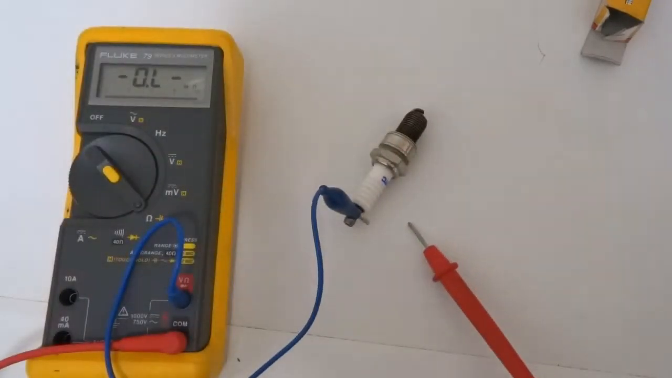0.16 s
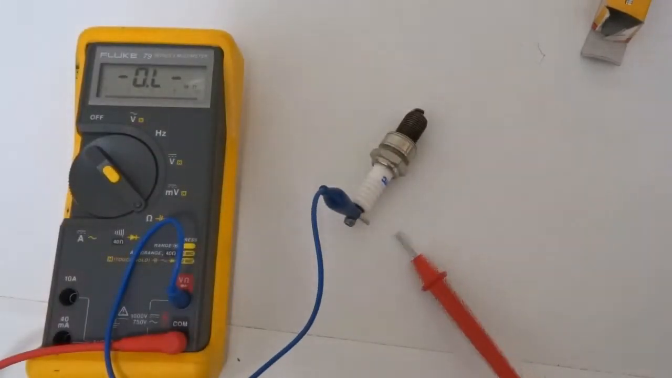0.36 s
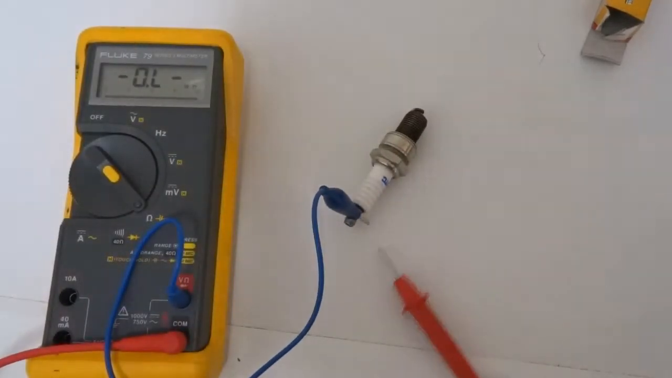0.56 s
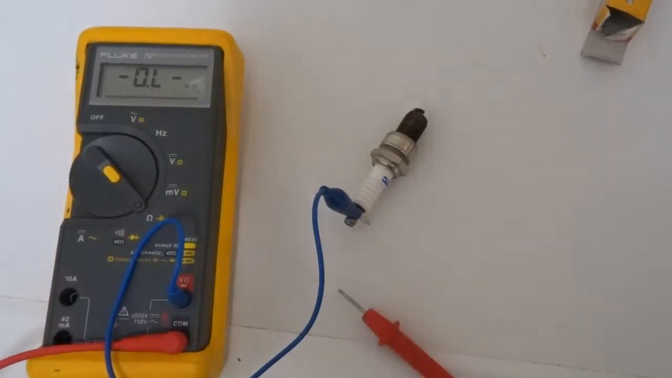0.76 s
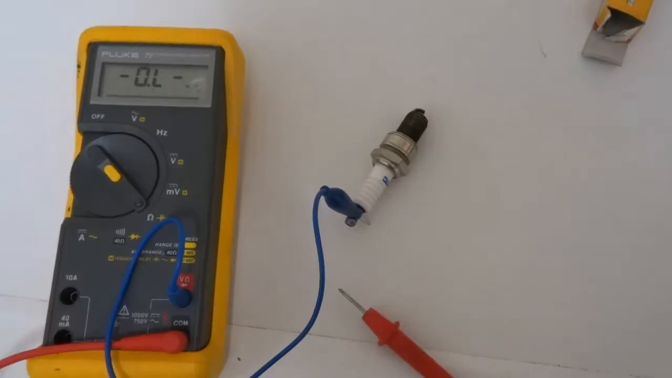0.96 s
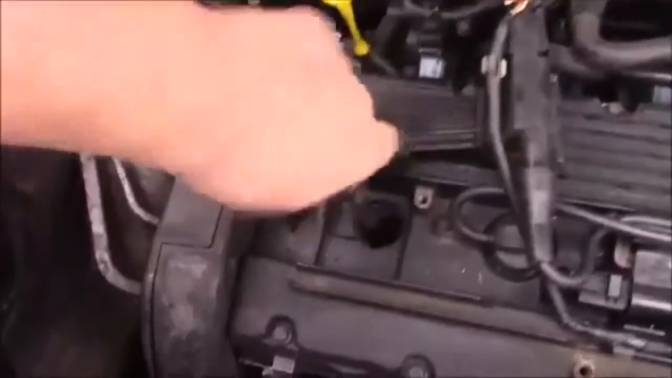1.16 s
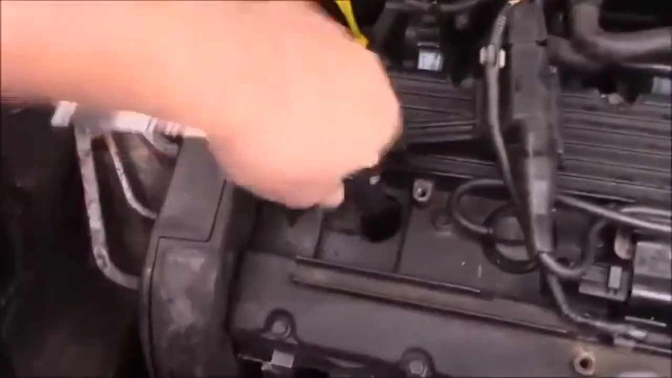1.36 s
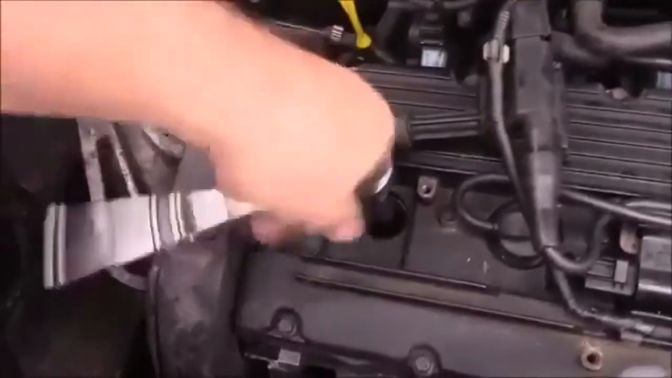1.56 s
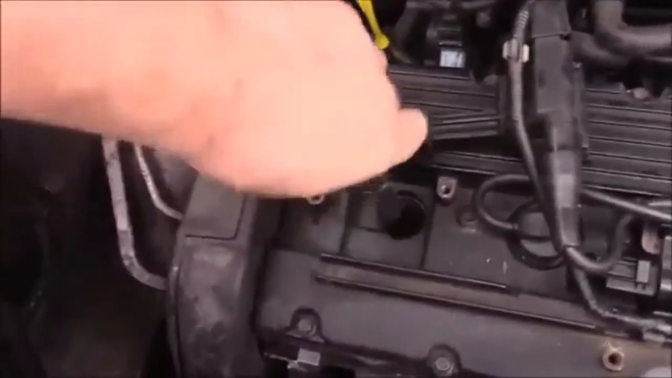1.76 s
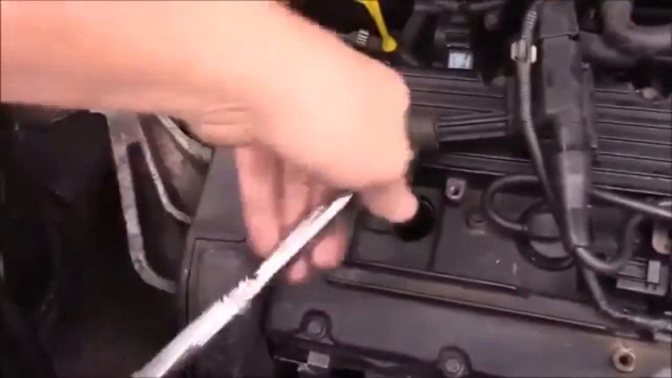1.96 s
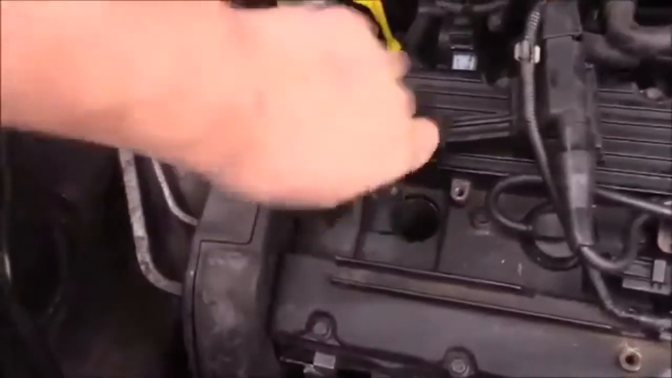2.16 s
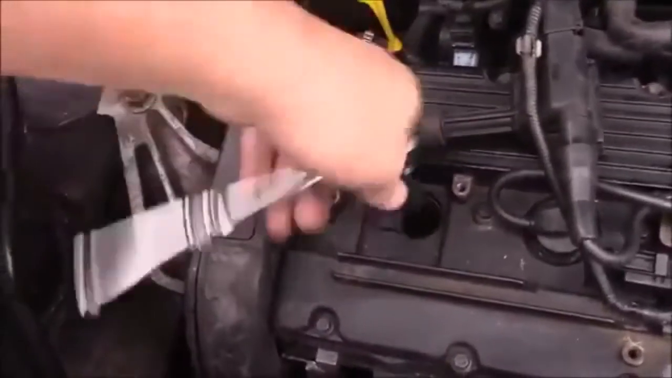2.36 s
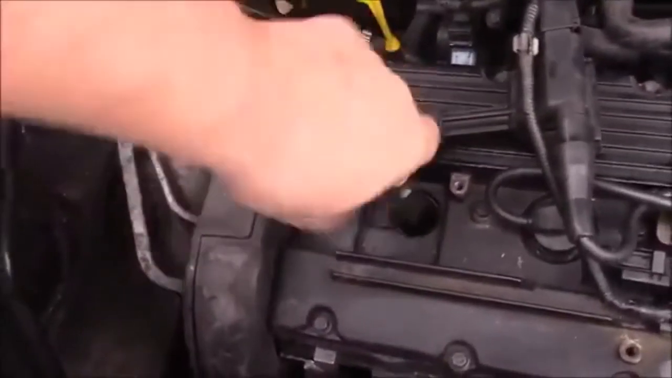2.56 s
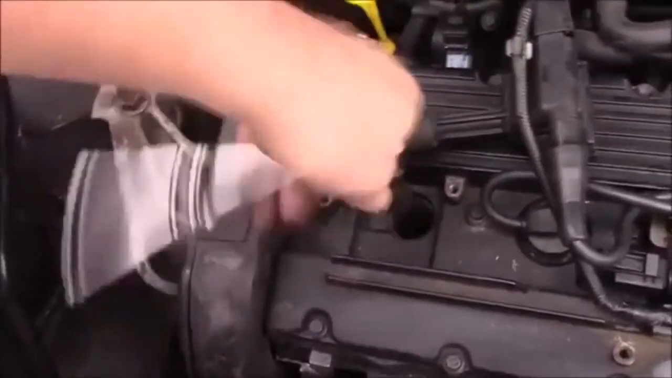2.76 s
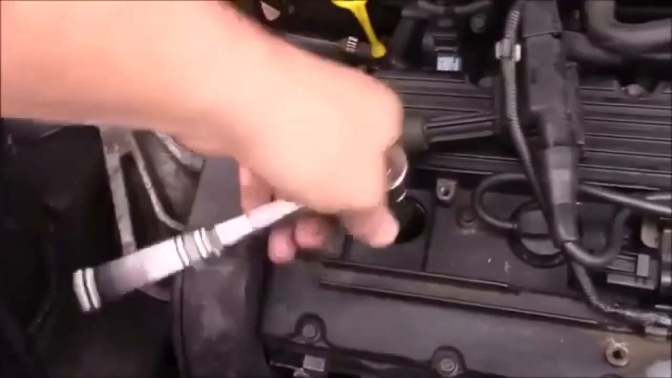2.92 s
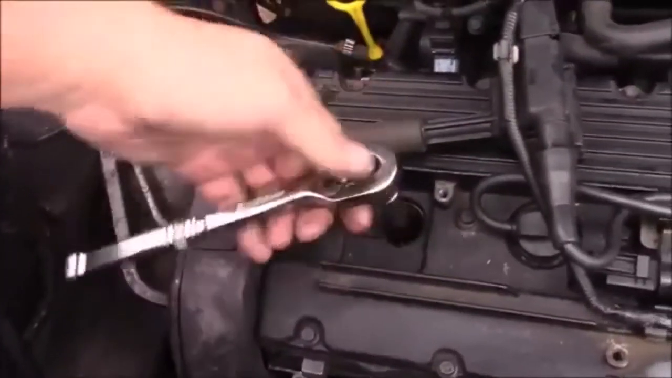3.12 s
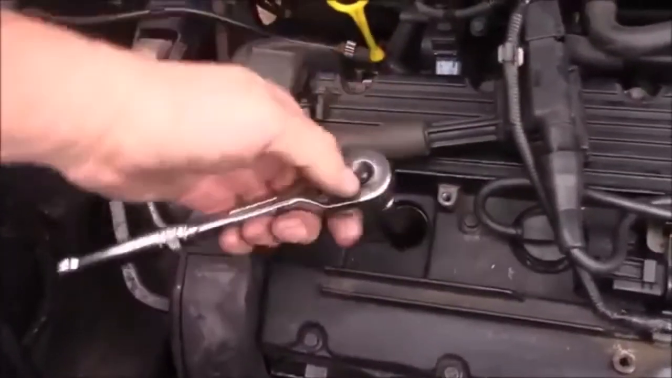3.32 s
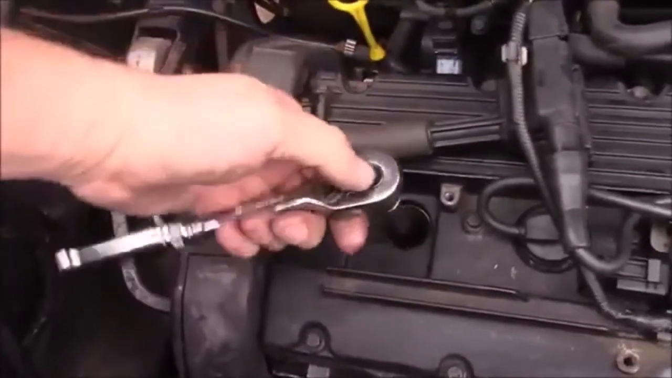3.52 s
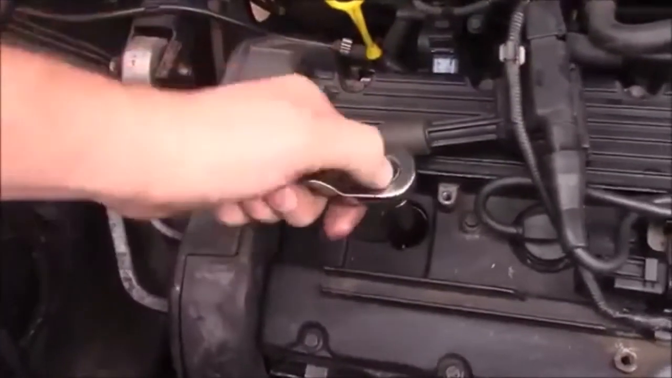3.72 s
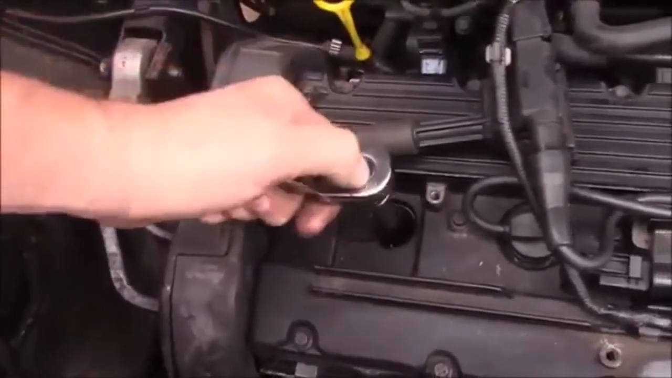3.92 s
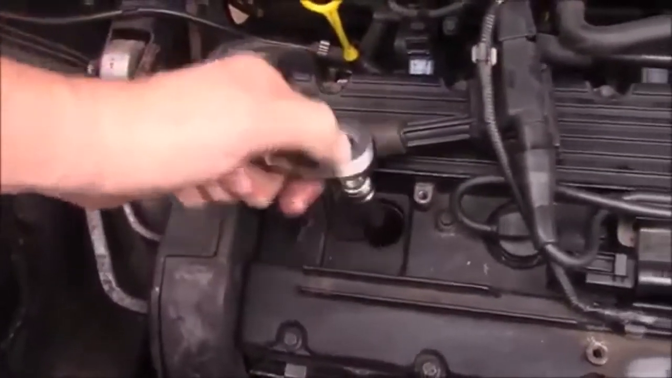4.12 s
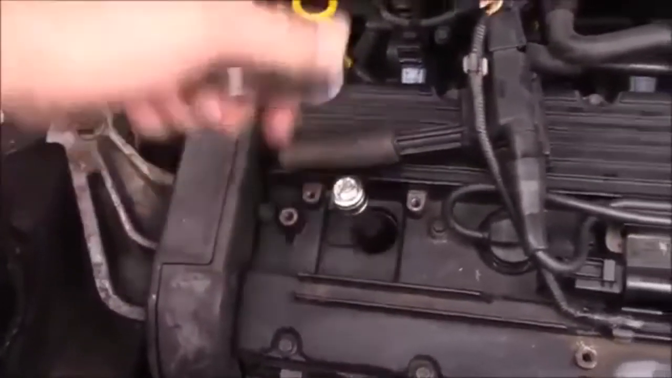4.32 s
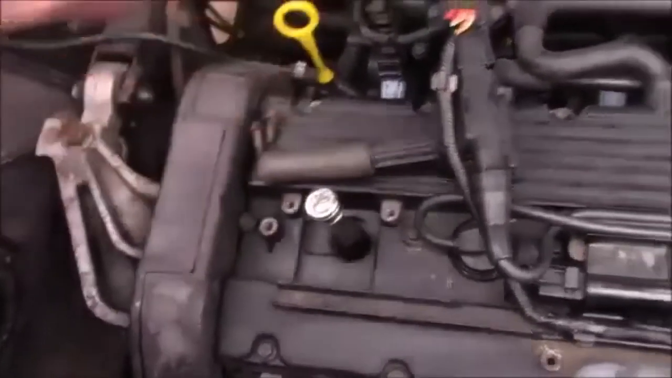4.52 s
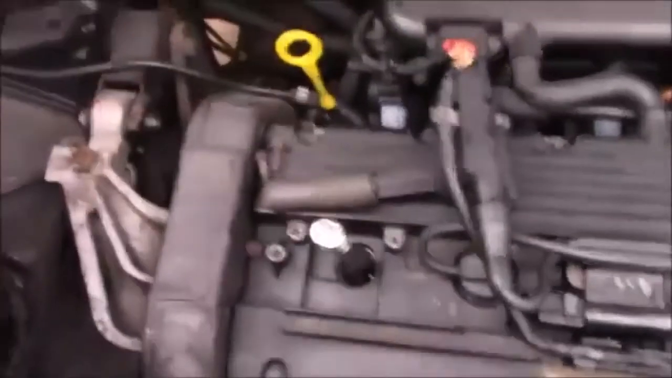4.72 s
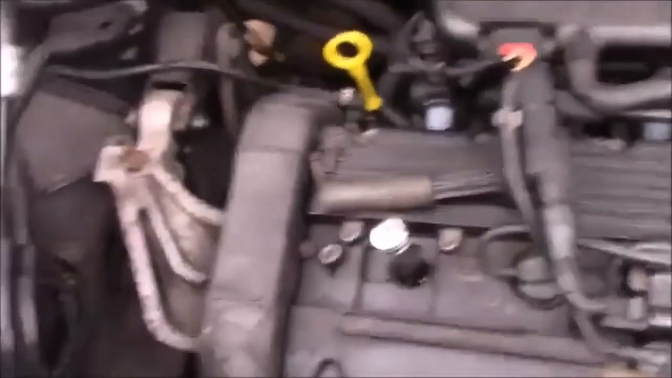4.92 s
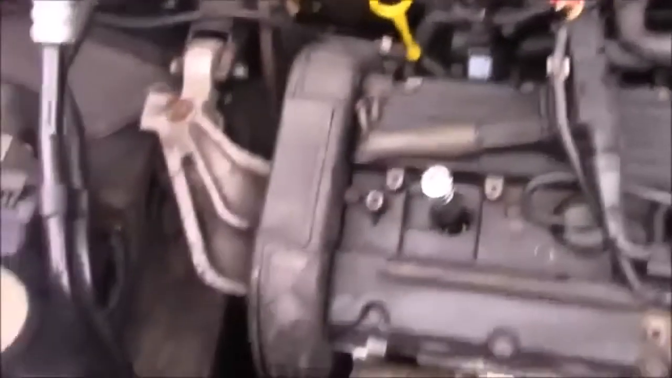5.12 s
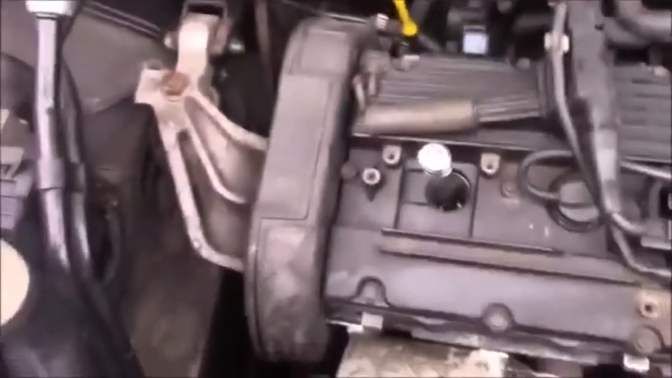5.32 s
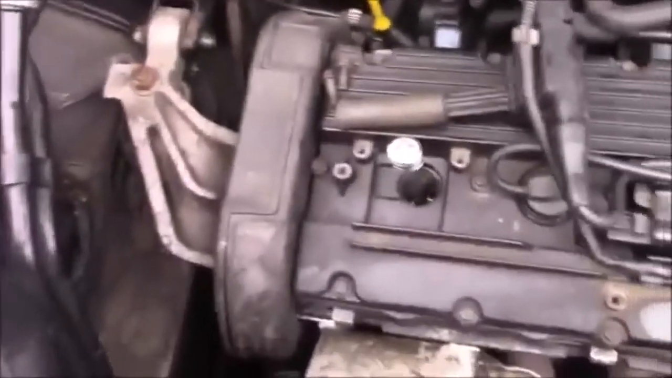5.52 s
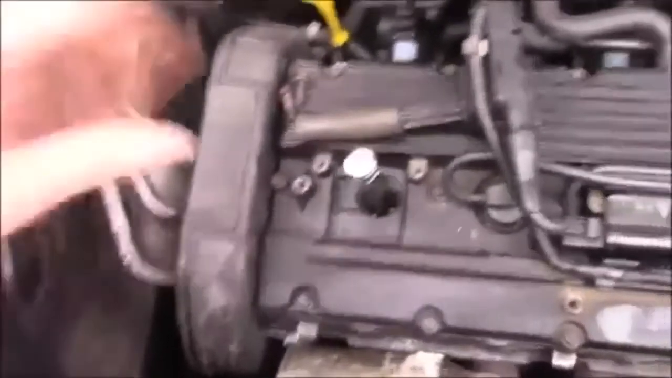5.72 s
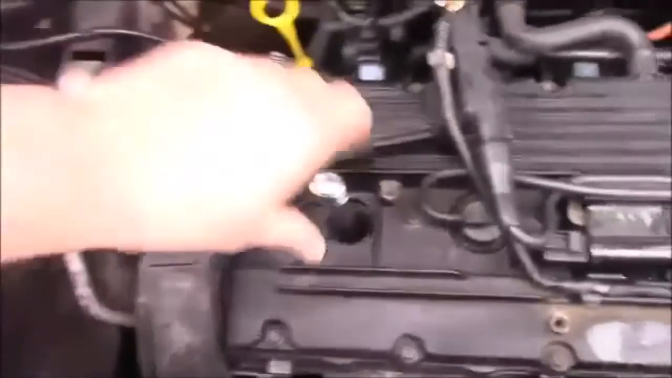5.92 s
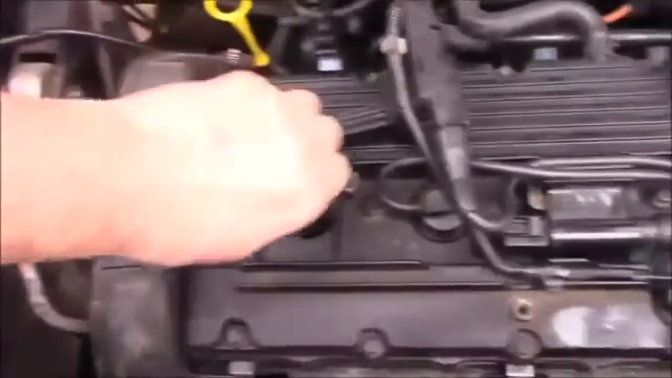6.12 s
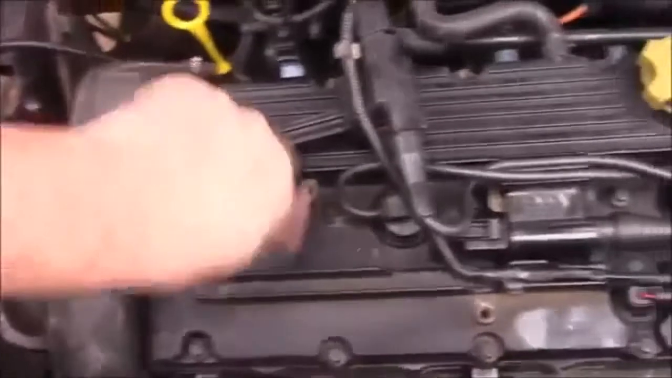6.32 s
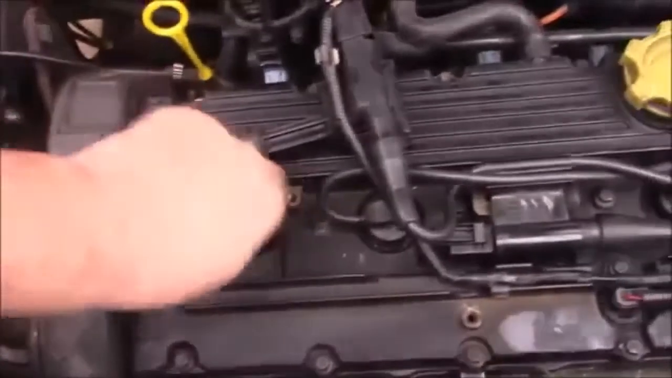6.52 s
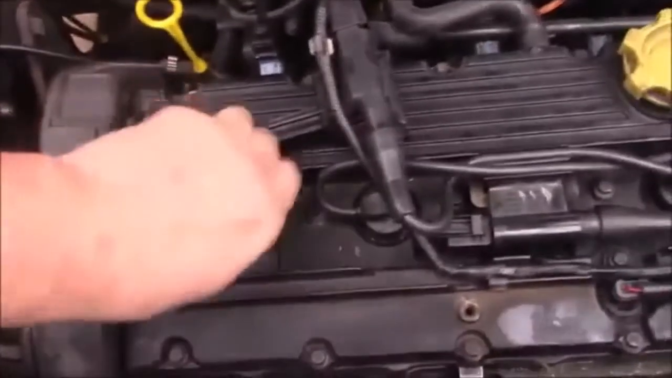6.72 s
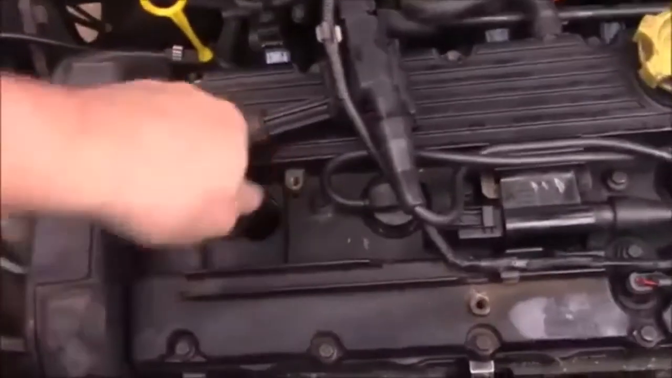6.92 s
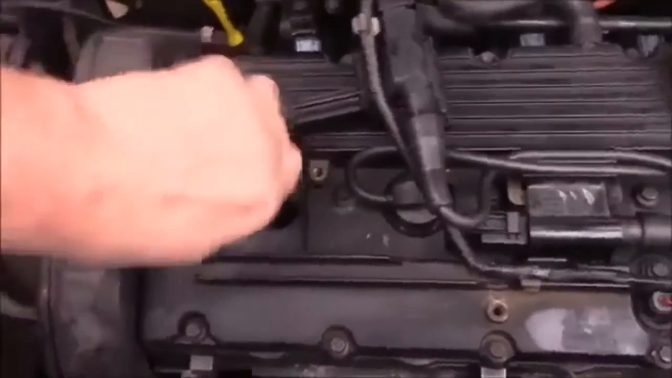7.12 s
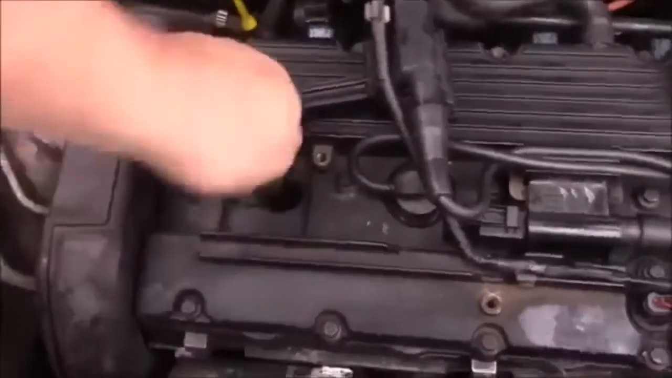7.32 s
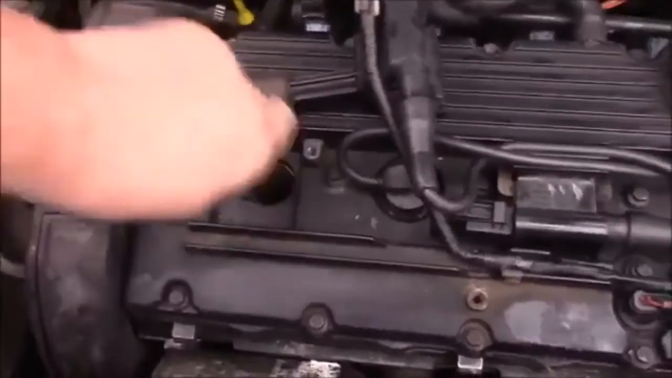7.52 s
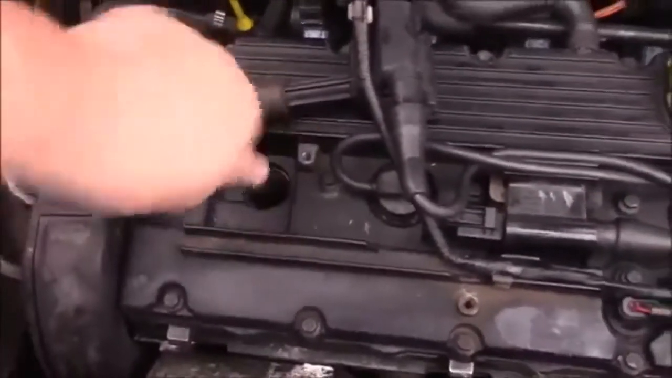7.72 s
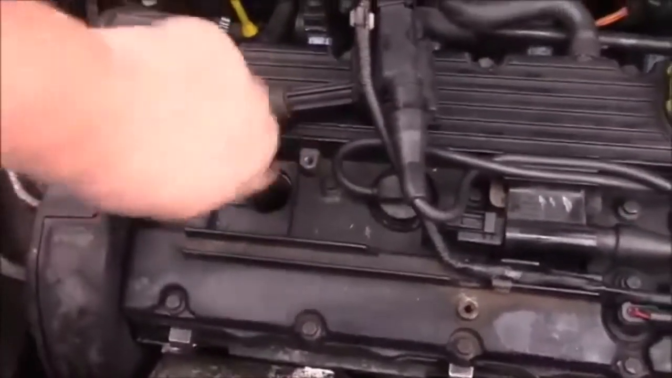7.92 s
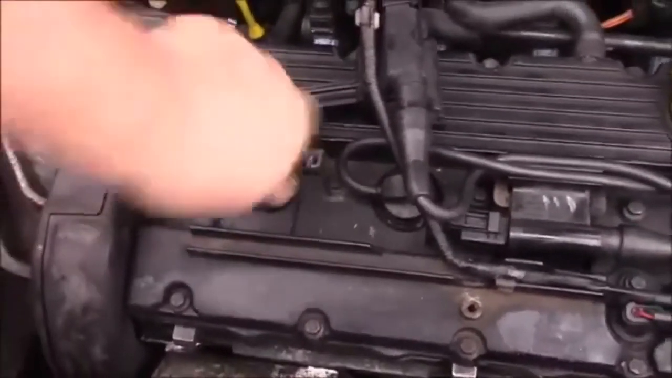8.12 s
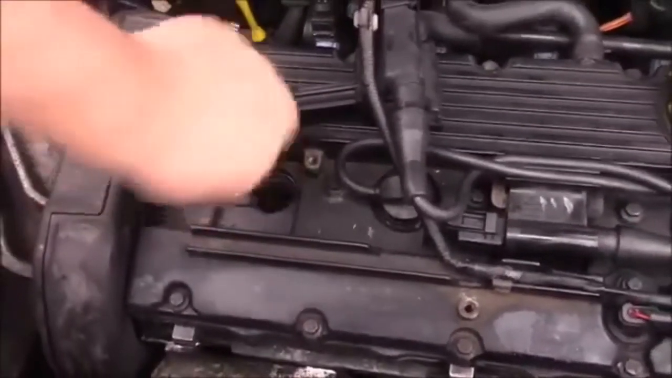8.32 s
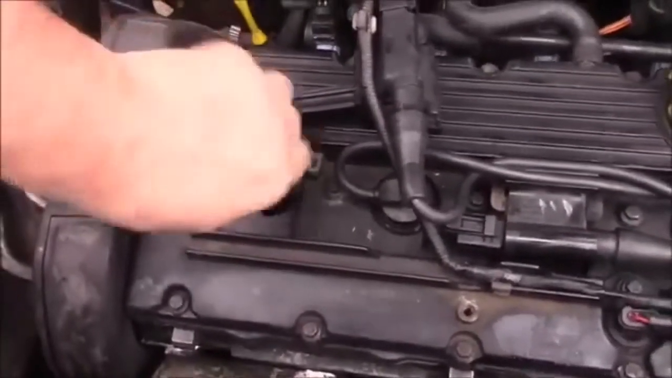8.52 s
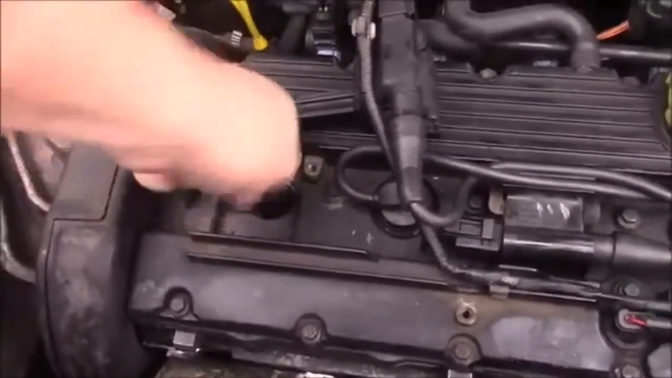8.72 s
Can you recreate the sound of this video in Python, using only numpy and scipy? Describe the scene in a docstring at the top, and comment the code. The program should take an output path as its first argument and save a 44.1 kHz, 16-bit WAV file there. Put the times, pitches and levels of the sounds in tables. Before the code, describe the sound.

Dull knocks and a short drag of a test lead sound on a bench in a small room. The sound cuts to an open garage with faint far traffic, where a close ratchet turns a spark plug in short runs of ringing clicks. A bird whistles faintly outside while a socket taps the engine. The wrench lands on a metal panel with a loud, bouncing clatter, leaving sparse ticks and soft finger rubbing.

```python
"""A probe lead drags and knocks on a bench in a small room, heard through a dull microphone.
After a silent cut we are in an open garage, close to a ratchet wrench turning a spark plug: the pawl
cracks over the teeth and rings the steel. Fingers rub, the socket ticks on the engine, the wrench drops
and bounces on a metal panel, and the fingers turn the socket in its well.
Outside, a songbird whistles over distant traffic."""
import sys
import numpy as np
from scipy import signal
from scipy.io import wavfile

SR = 44100
rng = np.random.default_rng(int(sys.argv[2]) if len(sys.argv) > 2 else 0)


def dump(signal):
    """Clip the signal to [-1, 1] and save it as 16-bit WAV at the path in sys.argv[1]."""
    limited = np.clip(np.atleast_2d(signal).T, -1, 1)
    pcm = np.round(limited * 32767).astype(np.int16)
    wavfile.write(sys.argv[1], SR, pcm)


N = 386757
TIME = np.arange(N) / SR
BAND_EDGES_HZ = 28 * 2 ** np.arange(0, 9.4, .5)


def from_db(db):
    """Gain of a level in dB."""
    return 10 ** (np.asarray(db) / 20)


def at_hz(points, hz):
    """Reads (frequency, value) rows on a log axis."""
    known_hz, values = np.transpose(points)
    return np.interp(np.log(hz), np.log(known_hz), values)


def placed(sound, start_s):
    """Sets a stretch of stereo sound into the scene."""
    out, start = np.zeros((2, N)), int(start_s * SR)
    out[:, start:start + sound.shape[-1]] = sound[..., :N - start]
    return out


def drift(rate_hz):
    """Slow random wander with a spread of 1."""
    step, settle = 40, 2000
    pole = np.exp(-2 * np.pi * rate_hz * step / SR)
    white = rng.standard_normal(N // step + settle + 2)
    slow = signal.lfilter([1], [1, -2 * pole, pole * pole], white)[settle:]
    return np.interp(np.arange(N) / step, np.arange(len(slow)), slow / slow.std())


def swells(rows):
    """Gain that climbs to each loudest moment and falls away at steady rates."""
    t = TIME[::40]
    arcs_db = [db - np.where(t < s, swell * (s - t), fade * (t - s)) for s, db, swell, fade in rows]
    return from_db(np.interp(TIME, t, np.max(arcs_db, axis=0)))


def narrow_noise(hz, width_hz):
    """Noise twice through one resonance; rms 1."""
    radius = np.exp(-np.pi * width_hz / SR)
    resonance = [0.92, 0.0099, -1.1, 1, -2 * radius * np.cos(2 * np.pi * hz / SR), radius ** 2]
    out = signal.sosfilt([resonance] * 2, rng.standard_normal(N))
    return out / out.std()


def banded_noise(spectrum, gain_at, size, width):
    """Stereo noise in half-octave bands: spectrum sets each band's level, gain_at(hz) its course."""
    out, white = 0, rng.standard_normal((2, 2, size))
    for k, edges in enumerate(zip(BAND_EDGES_HZ, BAND_EDGES_HZ[1:])):
        hz = np.sqrt(edges[0] * edges[1])
        band_db = at_hz(spectrum, hz)
        if band_db < -42:
            continue
        band = signal.butter(2, edges, "band", fs=SR, output="sos")
        mid, side = from_db(band_db) * signal.sosfilt(band, white[k % 2] * (gain_at(hz) + 1e-9))
        out = out + mid + from_db(at_hz(width, hz)) * side * [[1], [-1]]
    return out


def patchy_noise(rows, spectrum, width, low_db, high_db, crossover_hz, patchy_db):
    """Uneven noise whose lows and highs each follow a level curve."""
    times, lows, highs = np.transpose(rows)
    on = slice(int(times[0] * SR), int(times[-1] * SR))
    low = np.interp(TIME[on], times, lows) + low_db
    high = np.interp(TIME[on], times, highs) + high_db
    together = drift(1.6)

    def gain_at(hz):
        high_share = 1 / (1 + (crossover_hz / hz) ** 4)
        return from_db(low + high_share * (high - low) + patchy_db * (together + drift(15))[on])
    return placed(banded_noise(spectrum, gain_at, len(low), width), on.start / SR)


def ring(times, level_db, modes, width, spread_db, stretches=1, colour=lambda hz: 0):
    """Every blow strikes every mode with its own strength; stretches scale how long it rings."""
    out, chance = np.zeros((2, N + SR)), rng.normal(0, 1, (len(times), len(modes), 2))
    hz, mode_db, t60 = np.transpose(modes)
    blow_db = np.transpose([level_db + colour(f) for f in hz])
    gains = from_db(blow_db + mode_db + spread_db * chance[..., 0])
    pans = chance[..., 1] * from_db(at_hz(width, hz))
    for s, gain, stretch, pan in zip(times, gains, stretches * np.ones(len(times)), pans):
        t = np.arange(int(min(t60.max() * stretch, .9) * SR))[:, None] / SR
        tones = gain * from_db(-60 * t / (t60 * stretch)) * np.sin(2 * np.pi * hz * t)
        mid, side = tones.sum(1), (tones * pan).sum(1)
        out[:, int(s * SR):int(s * SR) + len(t)] += mid + side * [[1], [-1]]
    return out[:, :N]


def crack(times, level_db, t60, spectrum, colour, width, tail_db, tail_t60, damping, snap_db):
    """A snap at contact, then noise that dies sooner in the treble, over the tail of the surroundings."""
    starts = ((times - times.min()) * SR).astype(int)
    size = starts.max() + SR // 2 + 5000
    snap = from_db(snap_db - 60 * np.arange(200) / (0.0028 * SR))

    def gain_at(hz):
        gains = from_db(level_db + colour(hz))
        shorter = (1000 / hz) ** damping / (1 + (hz / 11000) ** 4)   # air and grip kill the very top
        impulses = np.full(size, 1e-18)
        np.add.at(impulses, starts, gains * from_db(tail_db))
        envelope = signal.lfilter([1], [1, -from_db(-60 / (tail_t60 * shorter * SR))], impulses)
        for start, gain, length in zip(starts, gains, np.clip(t60 * shorter, .005, .6) * SR):
            envelope[start:start + int(length)] += gain * from_db(-60 * np.arange(int(length)) / length)
            envelope[start:start + len(snap)] += gain * snap
        return signal.lfilter([.15], [1, -.85], envelope)   # each click's onset is slightly softened
    return placed(banded_noise(spectrum, gain_at, size, width), times.min())


def blows(rows, modes, spectrum, hinges_hz, width, ring_db, crack_db, bass_cut_hz, **crack_shape):
    """Struck modes plus crack; a dull blow lifts the lows, a sharp one the top."""
    times, level_db, low_db, top_db, t60 = np.transpose(rows)
    tilt_db = np.array([low_db - low_db.mean(), np.zeros(len(times)), top_db - top_db.mean()])

    def colour(hz):
        weights = [np.interp(np.log(hz), np.log(hinges_hz), hinge) for hinge in np.eye(3)]
        return np.array(weights) @ tilt_db
    tones = ring(times, level_db + ring_db, modes, width, 6.5, t60 / t60.mean(), colour)
    noise = crack(times, level_db + crack_db, t60, spectrum, colour, width, **crack_shape)
    bass_cut = signal.butter(3, bass_cut_hz, "high", fs=SR, output="sos")   # the deep bass of the blows is cut away
    return signal.sosfilt(bass_cut, tones + noise + 1e-12)


# Stereo width of the small room: (frequency [Hz], side against mid [dB])
ROOM_WIDTH = [(60, -14), (180, -23.5), (550, -14.5), (1650, -10.5), (4970, -6), (15000, -10)]
# The lead moving over the bench: (time [s], relative rumble [dB], relative hiss [dB])
LEAD_DRAG = [(0.0, -50.5, -66.5), (0.3, -47.5, -74.5), (0.468, -51, -66), (0.522, -49, -64),
             (0.656, -32, -54), (0.75, -52.5, -68), (0.828, -50.5, -70.5), (0.88, -81, -80),
             (.97, -56, -70)]
# Colour of the drag in that room: (frequency [Hz], density [dB])
DRAG_SPECTRUM = [(18, -40), (30, -8), (135, -20.5), (233, -0.5), (527, -19.5), (611, -24.5), (763, -7.5),
                 (1350, -10.5), (3120, -20.5), (11000, -22.5), (14300, -49.5), (22000, -120)]
# The lead's faint whine: (loudest at [s], level [dB], swell [dB/s], fade [dB/s])
LEAD_WHINE = [(.6, -47.5, 400, 140)]
def dragged_lead():
    """The probe lead rumbles and hisses over the bench, and briefly sings."""
    whine = swells(LEAD_WHINE) * narrow_noise(5400, 159)
    return whine + patchy_noise(LEAD_DRAG, DRAG_SPECTRUM, ROOM_WIDTH, low_db=13.0, high_db=30.5,
                                crossover_hz=2840, patchy_db=2.5)


# Knocks in the small room: (time [s], relative level [dB], low tilt [dB], top tilt [dB], base decay [s])
BENCH_KNOCKS = [(0.267, -40.5, -6.5, -22, 0.22), (0.304, -26.5, -17.5, -31.5, 0.25),
                (0.35, -34, -4.5, -32, 0.2), (0.506, -8.5, -17, -58, 0.26), (0.537, -39, -6, -31, 0.067),
                (0.555, -24, -21.5, -12, 0.33), (0.588, -35, -8, -3.5, 0.37), (0.72, -70, -11, -8.5, 0.48),
                (0.854, -50, -5, 2.5, 0.6), (0.87, -46, -8, -2, 0.34), (0.912, -20, -10.5, -12, 0.067)]
# Modes of the bench: (frequency [Hz], level [dB], base decay [s])
BENCH_MODES = [(202.5, -7, 0.52), (560, -7, 0.074), (681, 7.5, 0.066), (1168, -19.5, 0.078),
               (1550, -30, 0.83), (1780, -3, 0.085), (2170, -24.5, 0.68), (2440, -38, 2.2),
               (2729, -35.5, 0.048)]
# Contact noise on the bench: (frequency [Hz], density [dB])
KNOCK_SPECTRUM = [(35, -62.5), (60, -30.5), (123, -20), (203, -11.5), (295, 7), (427, -11.5), (736, -6.5),
                  (1090, -12), (1760, -9), (3950, -28), (11000, -32), (14300, -57.5), (22000, -120)]
def bench_knocks():
    """The lead strikes the bench, which rings into the room."""
    return blows(BENCH_KNOCKS, BENCH_MODES, KNOCK_SPECTRUM, [280, 1100, 5000], ROOM_WIDTH,
                 ring_db=-14.5, crack_db=6.5, bass_cut_hz=120,
                 tail_db=-12.0, tail_t60=0.72, damping=0.048, snap_db=13.0)


# Stereo width of the outdoor air: (frequency [Hz], side against mid [dB])
OUTDOOR_WIDTH = [(60, -23.5), (180, -22.5), (550, -10.5), (1650, -10), (4970, -12), (15000, -21.5)]
# Far traffic, heard from the garage: (time [s], relative drone [dB], relative wash [dB])
TRAFFIC_LEVELS = [(1.12, -56.5, -70), (2, -54.5, -65), (3, -57.5, -68.5), (5, -55, -71), (7, -56.5, -68.5),
                  (8.77, -57.5, -69)]
# Its colour at that distance: (frequency [Hz], density [dB])
TRAFFIC_SPECTRUM = [(15, -51), (25, -26), (99, -0.5), (134, 2), (190, -8.5), (285, -1), (489, -16),
                    (641, -10.5), (1740, -22), (2160, -21.5), (3720, -27.5), (5880, -27), (12200, -35.5),
                    (16000, -64)]
def distant_traffic():
    """A low drone and a soft wash carry in from outside."""
    return patchy_noise(TRAFFIC_LEVELS, TRAFFIC_SPECTRUM, OUTDOOR_WIDTH, low_db=15.0, high_db=26.5,
                        crossover_hz=900, patchy_db=1.02)


# Back swings of the handle: (first tooth [s], base speed [teeth/s], slowing at start [share], at end
# [share], relative level [dB], head ring on first tooth [dB], on last [dB], shank ring [dB], low tilt [dB])
BACK_SWINGS = [(1.135, 109, 0.29, .522, -26.5, -6, -7, -17, -31.5),
               (1.5403, 112.1, .437, 0.71, -27.5, -8, -6, -15.5, -30.5),
               (2.0007, 127.3, 0.44, 0.47, -25.5, -8, -5, -21, -35),
               (2.478, 90, 0.018, .2, -24, -8.5, 0.5, -23, -18.5),
               (2.5086, 92, 0.054, .22, -28.5, -9, 0.5, -9.5, -33),
               (2.9004, 57.7, 0.075, 0.084, -26.5, -12, -12, -12.5, -24)]
# Length of each swing: (teeth [count])
SWING_TEETH = 6, 12, 14, 2, 9, 4
def pawl_teeth():
    """The handle speeds up and slows down, so the clicks close up and spread; no two are alike."""
    rows = []
    for count, swing in zip(SWING_TEETH, BACK_SWINGS):
        start, base_speed, slow_in, slow_out, level_db, head_first, head_last, shank_db, low_db = swing
        along = np.linspace(0, 1, count - 1)
        speed = base_speed * (1 - slow_in * (1 - along) ** 2 - slow_out * along ** 2)
        times = start + np.r_[0, np.cumsum(1 / speed)]
        for s, head_db in zip(times, np.linspace(head_first, head_last, count)):
            level, head, top, shank = rng.normal([level_db, head_db, -8, shank_db], [2, 3, 3, 3])
            rows.append((s, level, low_db, head, top, shank))
    return rows


# Stereo width close to the microphone: (frequency [Hz], side against mid [dB])
CLOSE_WIDTH = [(60, -22), (180, -35), (550, -36), (1650, -28), (4970, -20), (15000, -18)]
# Loose play in the wrench: (time [s], relative level [dB], low tilt [dB], top tilt [dB])
WRENCH_PLAY = [(1.128, -38.5, -27, -12.5), (1.2416, -44, -21.5, -19), (1.2504, -43, -12.5, -17.5),
               (1.2594, -36.5, -17.5, -15.5), (1.264, -40, -3, -18.5), (1.5032, -47.5, 5, -21.5),
               (1.514, -36, -9, -20.5), (1.7404, -48.5, -1.5, -20), (1.776, -45.5, -10, -12.5),
               (1.8593, -42, -11, -17), (1.9694, -41, -19, -29), (1.9863, -41, -18, -19),
               (2.0374, -38, 5, -10), (2.2016, -40.5, -15.5, -12), (2.2242, -35.5, -17, -9.5),
               (2.233, -41, 0, -5.5), (2.2584, -33.5, -14, -18), (2.367, -47, -8.5, -14.5),
               (2.4515, -50.5, -6, -13.5), (2.4984, -37, -11, -13), (2.6672, -35.5, -16.5, -28),
               (2.7045, -54.5, 6, -19), (2.729, -53, 0, -24), (2.7711, -38.5, -15, -47.5),
               (2.8704, -35.5, -18, -31), (2.8868, -39, -14.5, -22.5), (3.0136, -25, -37, -15.5)]
# Modes of the wrench's body, head and bending shank: (frequency [Hz], level [dB], decay [s])
BODY_MODES = [(621, -17, 0.066), (906, -21.5, 0.022), (1920, -26, 0.049), (2171, -14.5, 0.066),
              (2663, -14.5, 0.043), (3340, -16, 0.032), (3680, -20.5, .03), (5650, -19.5, 0.046),
              (5740, -10, 0.035), (6310, -14, 0.029), (10730, -8.5, 0.016), (11960, -13, 0.024)]
HEAD_MODES = [(7675, 2.5, 0.045), (7510, -5.5, 0.05), (7760, -4.5, .03)]
SHANK_MODES = [(4270, 3.5, 0.054), (4390, -18.5, 0.023)]
# The pawl's crack, close up: (frequency [Hz], density [dB])
PAWL_SPECTRUM = [(180, -47.5), (300, -22.5), (1560, -17), (4300, -11.5), (6960, -8), (7820, 1),
                 (8500, -14.5), (12500, -15.5), (15200, -29), (16000, -51)]
def ratchet():
    """Each tooth gives a short crack and rings the wrench; head and shank sing more on some teeth."""
    play = [(s, level, low, top + 3, top, top - 2.5) for s, level, low, top in WRENCH_PLAY]
    times, level_db, low_db, head_db, top_db, shank_db = np.transpose(pawl_teeth() + play)
    clicks = np.transpose([times, level_db, low_db, top_db, np.full(len(times), 0.042)])
    body = blows(clicks, BODY_MODES, PAWL_SPECTRUM, [800, 2500, 11000], CLOSE_WIDTH,
                 ring_db=-7.0, crack_db=4.5, bass_cut_hz=620,
                 tail_db=-4.5, tail_t60=.11, damping=.12, snap_db=2.0)
    head = ring(times, level_db + head_db - 1.8, HEAD_MODES, CLOSE_WIDTH, spread_db=4.0)
    shank = ring(times, level_db + shank_db + 5.0, SHANK_MODES, CLOSE_WIDTH, spread_db=0.9)
    return body + head + shank


# Faint hums in the garage: (frequency [Hz], width [Hz], start [s], end [s], level [dB])
GARAGE_HUMS = [(1273, 62, 1.38, 2.47, -66), (547.6, 19, 5.7, 6.3, -66), (138, 26, 7.95, 8.77, -64.5),
               (4330, 77, 3.1, 3.33, -73), (320, 96, 5.55, 5.74, -45.5)]
def hums():
    """Narrow bands of noise swell in, waver and fade."""
    out = np.zeros(N)
    for hz, width_hz, start, end, level_db in GARAGE_HUMS:
        fade = np.clip(np.minimum(TIME - start, end - TIME) / 0.07, 0, 1)
        out += from_db(level_db + 4.2 * drift(5.4)) * narrow_noise(hz, width_hz) * fade
    return out


# Skin and sleeve at the engine: (middle [s], length [s], relative rub [dB], relative top [dB])
RUB_STROKES = [(2.38, .2, -67.5, -77.5), (2.72, .28, -66, -79.5), (3.607, 0.16, -61, -80),
               (3.88, .05, -60, -89), (4.24, 0.056, -80, -70), (4.62, 0.24, -64.5, -86),
               (4.75, 0.094, -64, -64), (5.01, 0.09, -69.5, -74)]
# Fingers shifting on the socket:
# (start [s], mean gap [s], base length [s], relative rub [dB], relative top [dB], spread [dB])
FINGER_SHIFTS = 6.5, 0.3, .065, -71.5, -72.5, 3.5
# Colour of the rubbing: (frequency [Hz], density [dB])
RUB_SPECTRUM = [(1500, -30), (3000, -12.5), (5800, 1.5), (8000, -7.5), (12000, -4.5), (15000, -29.5)]
def rubbing_fingers():
    """Skin and sleeve rub in strokes that swell and fade."""
    start, gap, stroke, rub_db, top_db, spread_db = FINGER_SHIFTS
    shifts = [(rng.normal(s, 0.2 * gap), stroke * rng.uniform(.7, 1.26),
               *rng.normal([rub_db, top_db], spread_db)) for s in start + gap * np.arange(19)]
    t = np.arange(RUB_STROKES[0][0] - .2, N / SR, .01)
    middle, length, *levels = np.transpose(RUB_STROKES + shifts)
    fade_db = -24 * ((t[:, None] - middle) / length) ** 2
    curves_db = [np.maximum((level + fade_db).max(1), -110) for level in levels]
    return patchy_noise(np.transpose([t, *curves_db]), RUB_SPECTRUM, OUTDOOR_WIDTH, low_db=4.0,
                        high_db=8.5, crossover_hz=8215, patchy_db=2.0)


# Notes from outside the garage: (start [s], length [s], first pitch [Hz], turn pitch [Hz], last pitch [Hz],
# part before the turn [share], relative level [dB], change over the note [dB])
BIRD_NOTES = [(3.24, 0.1, 6500, 6380, 6000, .4, -82.5, -3), (3.51, 0.054, 6400, 6250, 4900, .25, -73, 7),
              (3.64, .07, 4290, 5350, 5130, .55, -63, -13), (3.767, 0.06, 7785, 7500, 6960, .17, -74, -2),
              (3.91, 0.11, 7100, 7870, 7740, .32, -71.5, -1),
              (4.15, 0.17, 7411, 7950, 7515, .42, -72.5, -10),
              (4.361, 0.29, 5820, 5230, 5150, 0.16, -65.5, -22.5),
              (4.778, 0.094, 5630, 5600, 4700, .28, -56.5, -25),
              (4.897, 0.061, 5940, 4590, 4870, 0.52, -61.5, -17),
              (4.998, 0.11, 7150, 6430, 6930, 0.18, -68, -3),
              (5.686, 0.099, 4220, 4210, 4260, 0.46, -69, -20),
              (5.786, 0.046, 5170, 5440, 6800, .3, -63, -14),
              (5.85, .075, 6800, 4630, 4718, 0.81, -69.5, -6),
              (6.04, 0.058, 6500, 6230, 4530, 0.19, -77, -3.5),
              (8.557, .06, 6110, 5910, 4512, 0.18, -83, -1), (8.69, 0.054, 4048, 4780, 5380, .4, -84, -7)]
def songbird():
    """Wavering, gliding whistles, smeared by a dense dying echo from walls and trees."""
    song = np.zeros(N)
    waver, flutter = 1 + .007 * drift(120), from_db(3 * drift(60))
    for start, length, first_hz, turn_hz, last_hz, share, level_db, change_db in BIRD_NOTES:
        on = slice(int(start * SR), int((start + length) * SR))
        age = TIME[on] - start
        hz = np.interp(age / length, [0, share, 1], [first_hz, turn_hz, last_hz]) * waver[on]
        edge = np.clip(np.minimum(age, length - age) / 0.0041, 0, 1)
        gain = edge * from_db(level_db + 6.5 + change_db * age / length) * flutter[on]
        song[on] = gain * np.sin(2 * np.pi * np.cumsum(hz) / SR)
    mid, side = rng.standard_normal((2, SR // 4)) * from_db(-27 - 60 * TIME[:SR // 4] / .22)
    echoes = signal.fftconvolve(song[None], mid + 0.31 * side * [[1], [-1]], axes=1)[:, :N]
    return song + echoes


# Close ticks on the engine: (time [s], relative level [dB], low tilt [dB], top tilt [dB], base decay [s])
ENGINE_TICKS = [(3.279, -50, -11, -11, 0.037), (3.594, -48, -10.5, -7, 0.12),
                (3.6335, -42.5, -28, -15, 0.025), (3.763, -54, -14, -4, 0.043),
                (3.7902, -44.5, -19, -23, 0.033), (3.8676, -53.5, -8, -16, 0.037),
                (3.9552, -46, -26, -10, 0.073), (4.0154, -43.5, -7, -3, 0.064),
                (4.035, -32, -10, 5.5, 0.031), (4.0776, -51, -3, -2, 0.16), (4.119, -41, -11, 4, 0.03),
                (4.219, -58, -13.5, -2, 0.03), (4.3066, -46.5, -17, -12, 0.043),
                (4.3664, -65, 11.5, -6, 0.07), (4.766, -34.5, -27, -8.5, 0.028),
                (5.7797, -61.5, 6, 8, 0.036), (5.9774, -28, -9, -35, 0.068),
                (6.1851, -53.5, -18, -28, 0.035), (6.3167, -49.5, 0.5, -40, 0.033),
                (6.3724, -55.5, -8, -4, 0.04), (6.41, -47, -2, -9.5, 0.034), (6.4211, -48, -6, 5, 0.021),
                (6.5933, -53.5, 0, -17.5, 0.023), (6.7549, -64, -1, 2, .028), (6.8194, -62.5, -3, -1, .03),
                (7.0007, -68, -5, 8.5, 0.03), (7.2823, -27.5, -37, -9.5, 0.016),
                (7.4666, -72, 17, -20, 0.036), (7.8273, -70, 12, -19.5, .036),
                (7.892, -60.5, 0.5, -9, 0.029), (7.9811, -41, -49.5, -11, 0.032),
                (8.3509, -54, -9, -36, 0.029), (8.478, -52, -11, -19, 0.066), (8.6404, -53, -8, -24, 0.03)]
# A typical faint tick: the same columns without the time
SOFT_TICK = -67.5, -3.5, -4.5, 0.1
# When the faint ticks fall: (start [s], end [s], ticks [count])
SOFT_TICK_SPANS = (3.1, 4.05, 7), (6.2, 8.3, 4)
# Modes of the socket: (frequency [Hz], level [dB], base decay [s])
SOCKET_MODES = [(605, 0.5, 0.058), (886, -19, 0.045), (2113, -12, 0.029), (4150, -15, 0.031),
                (6060, -14, .02)]
# Contact noise of a tick: (frequency [Hz], density [dB])
TICK_SPECTRUM = [(120, -62), (200, -38), (623, 7), (3190, -5), (7010, -2), (8120, -8), (11700, -17),
                 (15100, -43), (16000, -57)]
def socket_ticks():
    """Socket and fingers tap the engine: clear ticks, and fainter ones at random moments."""
    faint = [rng.normal((s, *SOFT_TICK), [0, 2, 4, 6.5, 0])
             for start, end, count in SOFT_TICK_SPANS for s in rng.uniform(start, end, count)]
    return blows(ENGINE_TICKS + faint, SOCKET_MODES, TICK_SPECTRUM, [700, 2600, 8500], CLOSE_WIDTH,
                 ring_db=-5.0, crack_db=3.0, bass_cut_hz=340,
                 tail_db=-15.5, tail_t60=0.11, damping=0.14, snap_db=3.0)


def clink(time_s, level_db, modes):
    """One light touch on metal rings a few modes of the wrench."""
    return ring(np.array([time_s]), np.array([level_db]), modes, CLOSE_WIDTH, spread_db=5.5)


# Bounces close by: (time [s], relative level [dB], low tilt [dB], top tilt [dB], base decay [s])
BOUNCES = [(5.099, -24, -12.5, -22, 0.091), (5.155, -8, -10.5, -13, 0.069), (5.191, -12, -16.5, -18, 0.087),
           (5.236, -26, -17, -34.5, 0.095), (5.254, -35, -3, -38, 0.18), (5.3, -3, -10.5, -14.5, 0.085),
           (5.324, -20, 0.5, -5, 0.21), (5.352, -0.5, -8.5, -10.5, 0.1), (5.431, -26, -2.5, -22.5, 0.14),
           (5.451, -19, -4, -15.5, 0.068), (5.474, 0, -8.5, -11.5, 0.1), (5.498, -24, -2, -23.5, 0.083),
           (5.556, -30, -23.5, -8, 0.12), (5.567, -10.5, -19, -5, 0.077), (5.62, -41.5, 6, -23.5, 0.24),
           (5.681, -41, 0.5, -29, 0.072)]
# Modes of the metal panel and the wrench handle: (frequency [Hz], level [dB], base decay [s])
PANEL_MODES = [(372, -18, 0.15), (580, -7.5, 0.25), (614, 2, 0.061), (651, 1.5, 0.12), (734.3, -9.5, .12),
               (1000, -11.5, 0.095), (1060, -7.5, 0.088), (1200, -10.5, 0.22), (1298, -3, 0.14),
               (1734, -13.5, 0.058), (1910, -16, .05), (2034, -16.5, 0.15), (2195, -7.5, 0.053),
               (2649, -14.5, 0.073), (2950, -15, 0.098), (4190, -21.5, 0.072), (6030, -19.5, 0.082),
               (7745, -30, 0.06)]
HANDLE_MODES = [(11790, 3.5, 0.17), (11850, -8, .07)]
# Contact noise on the panel: (frequency [Hz], density [dB])
PANEL_SPECTRUM = [(35, -69), (60, -41), (180, -18.5), (323, -8.5), (480, -15), (651, -2.5), (715, -7.5),
                  (1200, -8), (2410, -18), (2580, -20), (12100, -38.5), (16000, -58)]
# Bounces that leave the handle free: (time [s], level [dB], ring length [ratio])
FREE_BOUNCES = [(5.356, -27, .8), (5.482, -33.5, .55)]
# A thin high ring as it lands: (time [s], level [dB], modes (frequency [Hz], level [dB], decay [s]))
LANDING_RING = 5.168, -54, [(14200, 0, .09)]
def dropped_wrench():
    """The head touches metal as it is carried off; then the panel clangs and the handle rings high."""
    panel = blows(BOUNCES, PANEL_MODES, PANEL_SPECTRUM, [400, 1500, 8000], CLOSE_WIDTH,
                  ring_db=-14.5, crack_db=11.5, bass_cut_hz=210,
                  tail_db=-34.0, tail_t60=0.46, damping=0.087, snap_db=4.0)
    landing = clink(*LANDING_RING)
    touch = clink(time_s=4.3, level_db=-39.5, modes=HEAD_MODES)
    times, level_db, stretches = np.transpose(FREE_BOUNCES)
    handle = ring(times, level_db, HANDLE_MODES, CLOSE_WIDTH, spread_db=2.5, stretches=stretches)
    return touch + panel + landing + handle


# Turns down in the plug well: (loudest at [s], level [dB], swell [dB/s], fade [dB/s])
SOCKET_TURNS = [(6.24, -79, 300, 300), (6.42, -72, 300, 600), (6.6, -70.5, 200, 499.5),
                (6.85, -65, 160, 132), (7.29, -70, 250, 600), (7.63, -72, 120, 120), (7.9, -74, 150, 200),
                (8.355, -63.5, 1200, 300), (8.48, -77, 300, 500), (8.645, -67.5, 700, 109.5)]
def turning_socket():
    """The hollow of the socket murmurs unevenly with each turn."""
    return swells(SOCKET_TURNS) * from_db(5.0 * drift(31)) * narrow_noise(hz=2124, width_hz=230)


def scene():
    """The small room through a duller microphone, a moment of silence, then the open garage."""
    dull_microphone = signal.ellip(10, .5, 70, 11150, fs=SR, output="sos")
    room = signal.sosfilt(dull_microphone, dragged_lead() + bench_knocks())
    garage = (distant_traffic() + hums() + ratchet() + dropped_wrench() + socket_ticks()
              + rubbing_fingers() + turning_socket() + songbird())
    room_ends_s, garage_starts_s = 0.97, 1.1144
    fade_out = np.clip((room_ends_s - TIME) / 0.069, 0, 1)
    fade_in = np.clip((TIME - garage_starts_s) / 0.051, 0, 1)
    return fade_out * room + fade_in * garage


def record(dry):
    """The loudest blows are rounded off, the microphone droops at the top, then the top is cut."""
    rounded = np.tanh(dry / 1.15) * 1.15
    drooped = signal.sosfilt(signal.butter(6, 14600, fs=SR, output="sos"), rounded)
    return .85 * signal.sosfilt(signal.cheby2(12, 70, 16500, fs=SR, output="sos"), drooped)


dry = scene()
out = record(dry)
dump(out)
```